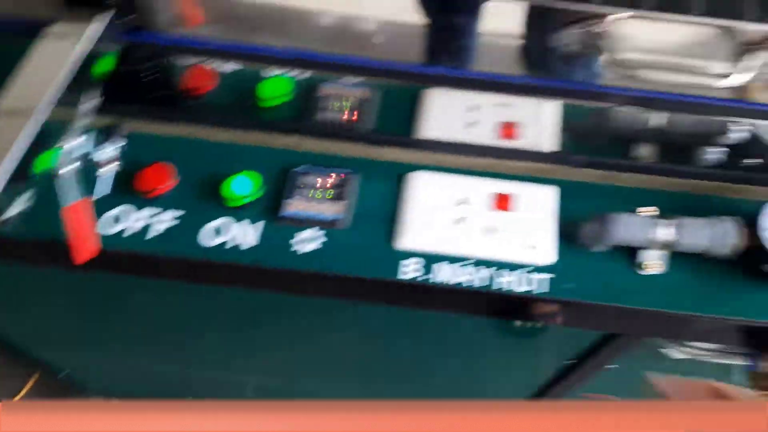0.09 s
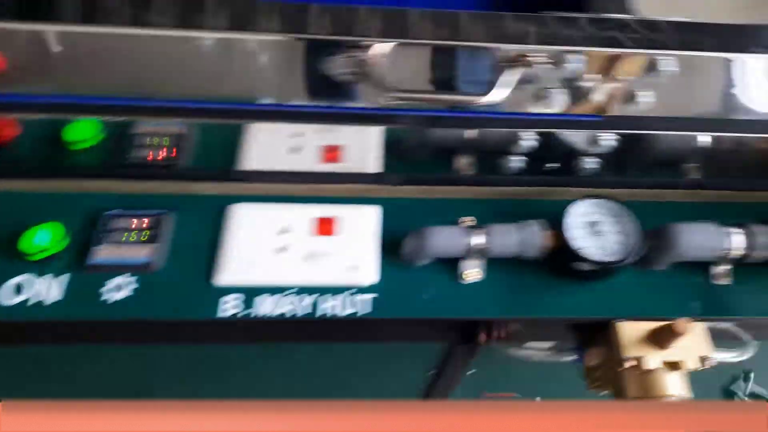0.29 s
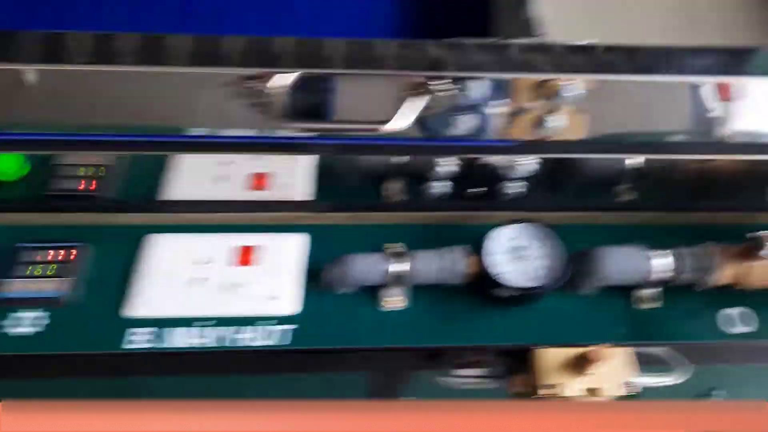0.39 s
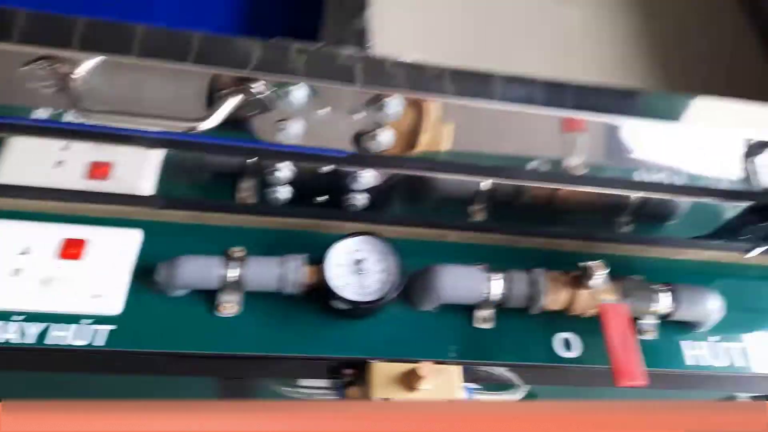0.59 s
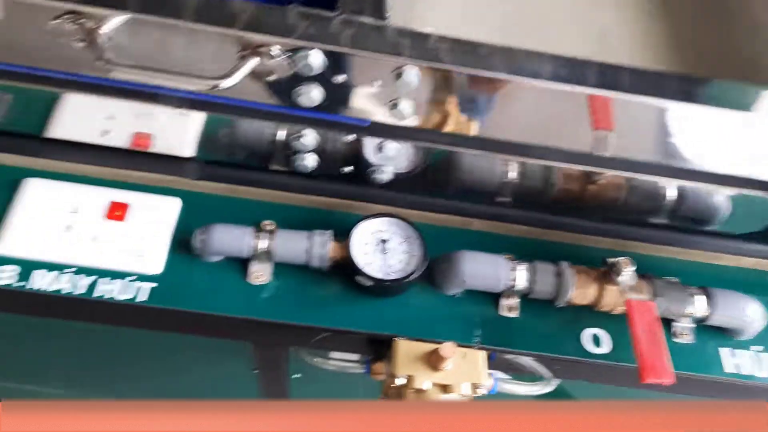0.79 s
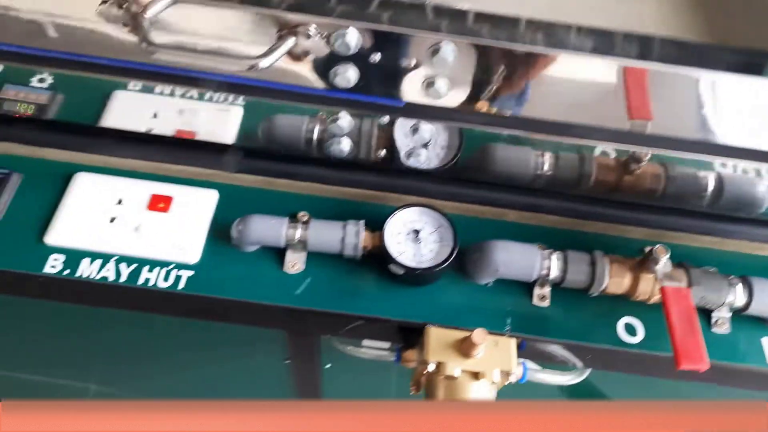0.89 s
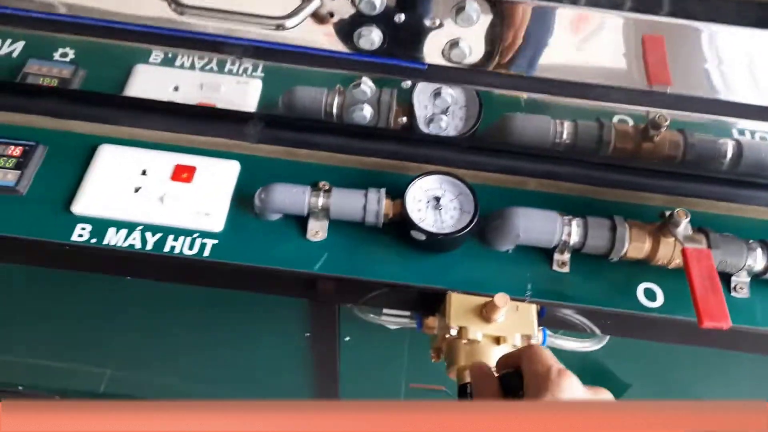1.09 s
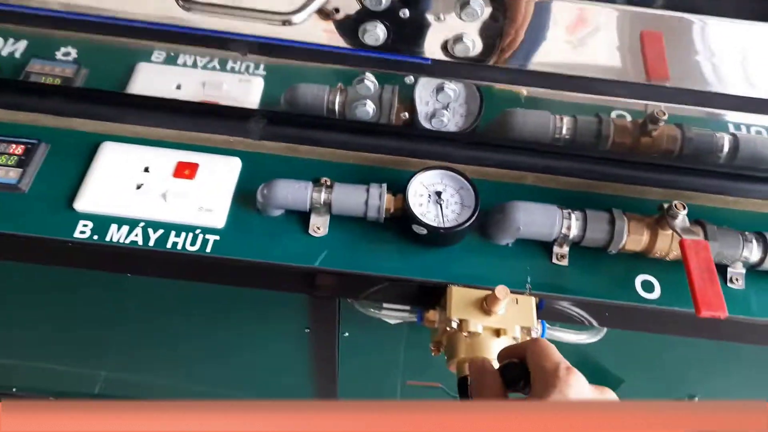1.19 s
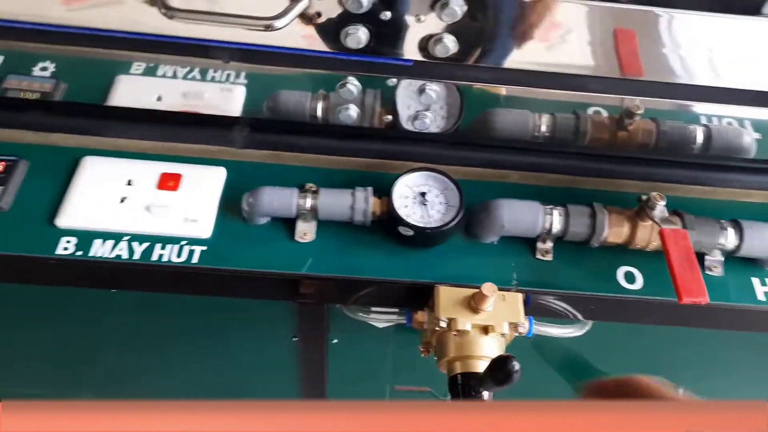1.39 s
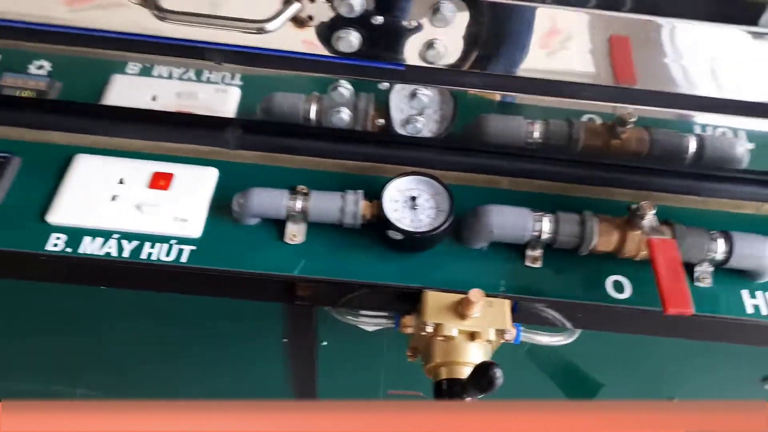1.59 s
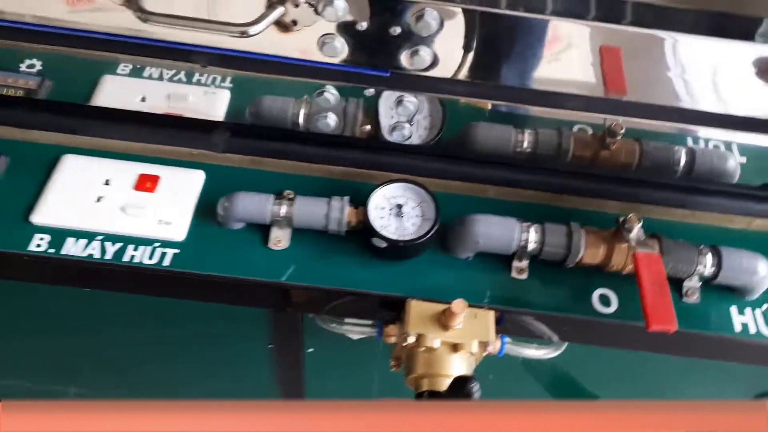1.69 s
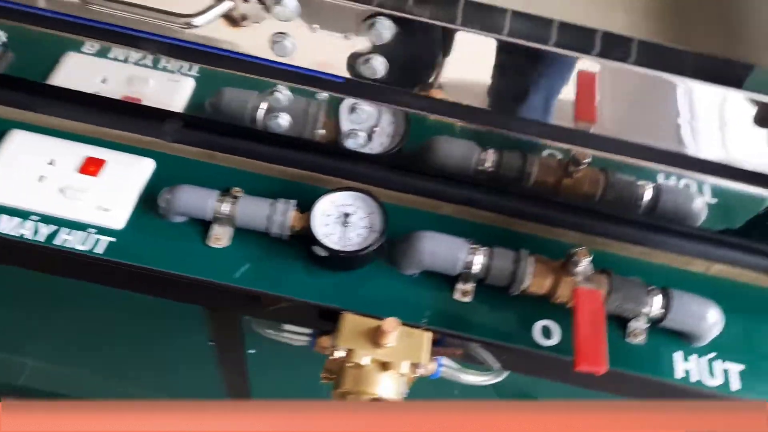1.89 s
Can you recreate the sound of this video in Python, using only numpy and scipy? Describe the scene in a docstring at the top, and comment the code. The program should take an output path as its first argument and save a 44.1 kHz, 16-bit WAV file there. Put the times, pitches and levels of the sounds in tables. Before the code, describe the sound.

A loud compressed-air blast from a brass hand valve: a knock, a harsh roaring hiss buffeting the close microphone, abrupt shut-off, a lever click and faint touches over low machinery rumble in a workshop.

```python
"""A hand valve on a workshop machine knocks open and vents compressed air for three quarters of a second.
Shaped noise makes the air: it spits through the narrow gap as the valve opens and shuts, and in between
the jet hisses while its stream roars and booms on the microphone. Noise bursts and ringing sines make the
knock; a noise tick and clack make the lever click back as the hiss dies in the room. Behind are machinery
rumble, light touches and faint rustles. Gain control ducks the whole sound and recovers slowly."""
import sys
import numpy as np
from scipy import signal
from scipy.fft import rfft, irfft
from scipy.io import wavfile
from scipy.ndimage import uniform_filter1d

SR = 44100
rng = np.random.default_rng(int(sys.argv[2]) if len(sys.argv) > 2 else 0)


def master_out(mix):
    """Clip the mix to full scale and print it as 16-bit PCM to the path in sys.argv[1]."""
    frames = np.transpose(np.atleast_2d(mix))
    ceiling = np.clip(frames, -1, 1)
    pcm = np.round(ceiling * 32767).astype(np.int16)
    wavfile.write(sys.argv[1], SR, pcm)


N = 83790
TIME = np.arange(N) / SR  # seconds
FREQS = np.maximum(np.fft.rfftfreq(N, 1 / SR), 1)  # Hz, kept above zero for the logarithms


def from_db(db):
    """Decibels to gain."""
    return 10 ** (np.asarray(db) / 20)


def at_hz(table, hz, column=1):
    """One column of a table, read between its rows on a log-frequency axis."""
    table = np.array(table)
    return np.interp(np.log(hz), np.log(table[:, 0]), table[:, column])


# A slight random unevenness, stronger towards the treble, roughens every noise spectrum.
UNEVEN_DB, UNEVEN_WIDTH_HZ = 0.9, 55


def air(table, alike_hz=1):
    """Stereo noise coloured by a table for each side; well below alike_hz both sides hear the same."""
    white = rfft(rng.standard_normal((3, N)))  # left, right and shared
    share = 1 / (1 + (FREQS / alike_hz) ** 2)
    mixed = np.sqrt(1 - share) * white[:2] + np.sqrt(share) * white[2]
    colour = from_db([at_hz(table, FREQS, column=1), at_hz(table, FREQS, column=2)])
    uneven = np.interp(FREQS / UNEVEN_WIDTH_HZ, np.arange(1000), rng.standard_normal(1000))
    uneven = uneven * FREQS / (FREQS + 2000)  # stronger towards the treble
    colour = colour * from_db(UNEVEN_DB * uneven)
    colour = colour / np.sqrt(1 + (20 / FREQS) ** 4)  # fade out below 20 Hz
    return irfft(mixed * colour, N) * np.sqrt(SR / 2)  # the root makes the table's unit dB per Hz


def drift(rate_hz):
    """Slow random wandering for each side, with an overall spread of 1."""
    slow = irfft(rfft(rng.standard_normal((2, N))) / (1 + (FREQS / rate_hz) ** 2), N)
    return slow / slow.std()


def low_pass(x, hz):
    """Gentle causal filter that dulls the sound above hz."""
    return signal.sosfilt(signal.butter(2, min(hz, SR / 2 - 1000), fs=SR, output="sos"), x)


def swell(start, rise, hold, t60):
    """Straight rise, hold, then a fade that loses 60 dB in t60 seconds."""
    age = TIME - start
    fade_db = -60 * np.maximum(age - rise - hold, 0) / t60
    return np.clip(age / rise, 0, 1) * from_db(fade_db)


def swells(rows):
    """Add up one swell for each row of a table."""
    return sum(from_db(db) * swell(start, rise, hold, t60) for start, db, rise, hold, t60 in rows)


def pan(db):
    """Left and right gains: the left goes up by db and the right goes down by db."""
    return from_db([[db], [-db]])


# Workshop machinery. Each row: frequency in Hz, left and right level in dB per Hz before SHOP_DB.
SHOP_SPECTRUM = [(25, -83, -85), (58, -61.5, -65), (110, -63, -64), (156, -65.5, -66), (210, -79.5, -78.5),
                 (324, -67.5, -68), (520, -76, -78), (750, -79, -81.5), (1860, -80, -90.5),
                 (3200, -88, -97.5), (6300, -100, -96), (9500, -104, -119), (13500, -106, -112),
                 (15500, -114, -116)]
SHOP_ALIKE_HZ, SHOP_DB = 604, -0.5
# Faint high rustles. Each row: start in seconds, level in dB, rise, hold and 60 dB fade in seconds.
RUSTLE_TIMES = [(0.074, -14.5, 0.032, .07, .4), (1.58, -1.5, 0.037, 0.041, 0.56)]
# Colour of the rustles. Each row: frequency in Hz, left and right dB per Hz before the level of each rustle.
RUSTLE_SPECTRUM = [(1998, -110, -115), (5035, -92.5, -102), (8000, -88, -102), (10000, -92, -112),
                   (13500, -90.5, -94), (15500, -104, -106)]
# The hand lets go of the lever with two light touches. Each row: start in seconds, level in dB.
TOUCH_TIMES = [(1.345, -4), (1.366, -1)]
# Colour of the touches. Each row: frequency in Hz, left and right dB per Hz before the level of each touch.
TOUCH_SPECTRUM = [(300, -74, -87), (1100, -67.5, -73), (1450, -61, -70), (1620, -62, -67), (1850, -65, -71),
                  (2300, -76, -79), (3600, -69.5, -78), (7000, -105, -99)]


def workshop():
    """Steady noise for the machinery, and short noise swells for two rustles and two light touches."""
    rumble = from_db(SHOP_DB) * air(SHOP_SPECTRUM, SHOP_ALIKE_HZ)
    rustles = swells(RUSTLE_TIMES) * air(RUSTLE_SPECTRUM)
    touch_level = sum(from_db(db) * swell(start, rise=0.003, hold=0, t60=0.16) for start, db in TOUCH_TIMES)
    return rumble + rustles + touch_level * air(TOUCH_SPECTRUM)


# Ringing valve body and panel.
# Each row: frequency in Hz, level in dB before each knock's own, 60 dB fade in seconds, pan to the left in dB.
BODY_MODES = [(353, -8, 0.071, 1), (451, 1, .18, 2), (800, -6.5, 0.078, 5.5), (1000, -9.5, .03, 3),
              (1565, -3.5, .03, 5.5), (1865, -5, .03, 8), (2180, 4, .01, 4.5), (2579, -8, .025, 3.5),
              (3493, -17.5, .03, 5.5)]


def body_ring(start):
    """A blow sets the body's modes ringing as fading sines, each a little different on each side."""
    age = np.maximum(TIME - start, 0)
    ring = 0
    for k, (hz, db, t60, pan_db) in enumerate(BODY_MODES):
        gain = from_db(db + rng.normal(0, 1, (2, 1))) * pan(pan_db)
        phase = rng.normal(0, 0.41, (2, 1))  # radians
        wave = np.sin(2 * np.pi * hz * age + phase) * (-1) ** k  # every other mode is flipped
        ring = ring + gain * swell(start, rise=0.0003, hold=0, t60=t60) * wave
    return ring


# The valve spool strikes and rebounds. Each row: start in seconds, level in dB, contact cut-off in Hz.
SPOOL_KNOCKS = [(0.2043, -22.5, 2700), (0.2118, -28, 7170)]
# The panel's dense rattle under the knock. Each row: frequency in Hz, left and right dB per Hz.
THUD_SPECTRUM = [(150, -62.5, -71), (295, -48.5, -49.5), (420, -49, -48), (646, -56, -61),
                 (1315, -57, -61.5), (2320, -58, -64.5), (3200, -74, -76.5), (7000, -88, -91)]
CRACK_DB, CRACK_T60_S, CRACK_PAN_DB = 3, 0.023, 4.5  # level before each knock's own


def knock():
    """The spool hits its stop twice: short noise cracks and a ringing body over one thud of the panel."""
    first_start = SPOOL_KNOCKS[0][0]
    out = air(THUD_SPECTRUM) * swell(first_start, rise=0.002, hold=0, t60=0.12)
    for start, db, contact_hz in SPOOL_KNOCKS:
        burst = rng.standard_normal((2, N)) * swell(start, rise=0.00024, hold=0, t60=CRACK_T60_S)
        crack = from_db(CRACK_DB) * pan(CRACK_PAN_DB) * burst
        out = out + from_db(db) * low_pass(crack + body_ring(start), contact_hz)
    return out


# Room reverberation. Each row: frequency in Hz, 60 dB fade in seconds, relative strength in dB.
ROOM_BANDS = [(200, .5, -4), (750, 1, -2), (1900, 0.94, 2), (3302, 0.84, 0.5), (5500, 0.73, 1),
              (8900, .67, 2), (15000, 0.5, 0.5)]


def room(x):
    """Diffuse workshop echoes: a noise tail whose bands each have their own strength and fade."""
    edges = np.geomspace(60, 18000, 21)  # Hz
    white = rfft(rng.standard_normal((2, N))) * from_db(at_hz(ROOM_BANDS, FREQS, column=2))
    tail = 0
    for low, high in zip(edges, edges[1:]):
        band = irfft(white * (FREQS >= low) * (FREQS < high), N)
        t60 = at_hz(ROOM_BANDS, np.sqrt(low * high))
        tail = tail + band * swell(0.003, rise=0.002, hold=0, t60=t60)
    tail = tail / np.sqrt(np.sum(tail ** 2, axis=1, keepdims=True))  # same energy on each side
    return signal.fftconvolve(x, tail, axes=1)[:, :N]


OPEN_S, SHUT_S, OPEN_RAMP_S, SHUT_RAMP_S = 0.2425, 0.99, 0.004, 0.016  # ramps begin at OPEN_S and SHUT_S


def opening():
    """How far the valve stands open, from 0 to 1."""
    opened = np.clip((TIME - OPEN_S) / OPEN_RAMP_S, 0, 1)
    shut = np.clip((TIME - SHUT_S) / SHUT_RAMP_S, 0, 1)
    return opened * (1 - shut)


# The jet's own hiss. Each row: frequency in Hz, left and right dB per Hz before HISS_DB.
HISS_SPECTRUM = [(200, -54.5, -57.5), (700, -49.5, -58), (1300, -44, -49.5), (1980, -41, -48.5),
                 (3010, -41.5, -45), (4100, -41, -46.5), (5900, -42.5, -39), (7100, -42.5, -47.5),
                 (9100, -47, -62.5), (11000, -38.5, -59), (13500, -43.5, -52.5), (15630, -49, -54)]
HISS_DB = -1.5
# The valve passes half-open. Each row: start in seconds, level in dB, rise, hold and 60 dB fade in seconds.
SPIT_TIMES = [(0.2424, -2.5, 0.0023, 0.0088, 0.043), (0.953, -2.5, 0.0087, 0.0059, 0.081)]
# Its shrill spit. Each row: frequency in Hz, left and right dB per Hz before the level of each spit.
SPIT_SPECTRUM = [(1000, -49, -45), (3294, -37.5, -48), (4060, -37, -47.5), (4960, -30, -32.5),
                 (5400, -34, -32), (6000, -29, -27), (6700, -39, -36), (7860, -32, -32.5), (9160, -38, -58),
                 (11400, -44, -54.5), (15400, -35, -36)]


def jet():
    """Air rushing through the valve: steady noise while it is open, with a shrill burst at each end."""
    hiss = from_db(HISS_DB) * opening() * air(HISS_SPECTRUM)
    return hiss + swells(SPIT_TIMES) * air(SPIT_SPECTRUM)


CHURN_DB, CHURN_HZ = 1.0, 14


def churn(x):
    """Smaller eddies stir each octave of the roar by itself, so the colour keeps shifting."""
    spectrum = rfft(x)
    octave = np.round(np.log2(np.clip(FREQS, 500, 8000) / 500))
    out = 0
    for k in np.unique(octave):
        band = irfft(spectrum * (octave == k), N)
        out = out + band * from_db(CHURN_DB * drift(CHURN_HZ))
    return out


# Air buffeting the two microphone ports.
# Each row: frequency in Hz, left and right dB per Hz before the stream's strength.
BUFFET_SPECTRUM = [(25.3, -46.5, -52.5), (64.7, -32, -27), (140.5, -31, -29), (240, -33.5, -32),
                   (304, -26.5, -24), (385, -28.5, -28.5), (459, -33, -29), (700, -32, -33),
                   (2020, -35.5, -35), (4160, -40.5, -40), (6140, -43, -41), (7040, -46.5, -43),
                   (7800, -50, -48.5), (8650, -60, -54), (9500, -45.5, -56.5), (10200, -46, -48.5),
                   (11240, -43.5, -46), (13640, -37, -38), (15800, -44, -43.5)]
# Strength of the air stream at each port, before flutter. Each row: time in seconds, left and right level in dB.
STREAM_STRENGTH = [(.243, -27, -20), (.252, -13, -6), (.264, -7, -1), (.282, -5, -4.5), (.335, -0.5, 1.5),
                   (0.385, 0, 0), (.435, 0, 1.5), (.461, 5.5, 0.5), (.477, 4, 2.5), (.494, 6, 4),
                   (0.53, 3, 3), (.58, 3.5, 3.5), (.68, 1.1, 1.8), (.83, 1.5, 1), (.885, 1.5, 1.7),
                   (.935, 0.5, 0), (.968, -5, -5), (.98, -19, -21), (1.0, -42, -46), (1.04, -77, -77)]
FLUTTER_DB, FLUTTER_HZ = 0.3, 60
EDDY_DB, EDDY_HZ, EDDY_TOP_HZ = 1.5, 54, 550  # big eddies make the low end swell
LOW_FOLLOWS = 0.63  # share of the stream's dB swing that the low end follows: a weak stream sounds dull


def buffet():
    """The stream makes separate noise on each port; its low end swells in eddies and fades less than the top."""
    times, *sides = np.transpose(STREAM_STRENGTH)
    stream_db = np.array([np.interp(TIME, times, db) for db in sides])
    stream_db = stream_db + FLUTTER_DB * drift(FLUTTER_HZ)
    roar = air(BUFFET_SPECTRUM)
    low = irfft(rfft(roar) / (1 + (FREQS / EDDY_TOP_HZ) ** 4), N)
    top = from_db(stream_db) * churn(roar - low)
    eddies = from_db(LOW_FOLLOWS * stream_db + EDDY_DB * drift(EDDY_HZ))
    flowing = (TIME > times[0]) * (TIME < times[-1])
    return (top + eddies * low) * flowing


# Low gusts on the ports. Each row: start in seconds, level in dB, rise, hold and 60 dB fade in seconds.
GUST_TIMES = [(.248, -6, .006, .012, .06), (0.913, -0.5, 0.019, 0.037, 0.037)]
# Colour of the gusts. Each row: frequency in Hz, left and right dB per Hz before the level of each gust.
GUST_SPECTRUM = [(30, -39, -45.5), (70, -29.5, -29.5), (132, -29.5, -26), (221, -28, -43),
                 (300, -19.5, -15.5), (356, -39.5, -42.5), (480, -28.5, -31.5), (800, -51.5, -56),
                 (3000, -90, -89.5)]


def gusts():
    """Low noise swells: the stream booms on the ports as it first arrives and again as it slows."""
    return air(GUST_SPECTRUM) * swells(GUST_TIMES) * opening()


# The lever's housing. Each row: frequency in Hz, left and right dB per Hz.
CLACK_SPECTRUM = [(150, -81, -76), (350, -50, -49), (700, -61.5, -62), (1410, -57, -62), (2010, -49.5, -60),
                  (2700, -55, -66), (3800, -53, -56), (7000, -79, -72)]
CLICK_S, CLICK_DB, CLICK_T60_S, CLICK_PAN_DB = 1.079, -13, 0.02, 6  # level before the pan
CLACK_T60_S = 0.13


def lever_click():
    """The lever clicks home: a bright noise tick and the longer clack of its housing."""
    burst = rng.standard_normal((2, N)) * swell(CLICK_S, rise=0.00029, hold=0, t60=CLICK_T60_S)
    tick = from_db(CLICK_DB) * pan(CLICK_PAN_DB) * burst
    clack = air(CLACK_SPECTRUM) * swell(CLICK_S, rise=0.002, hold=0, t60=CLACK_T60_S)
    return tick + clack


ROOM_DB, KNOCK_ROOM_DB = -13, -7  # how much of the jet, and of the knock and click, goes into the room


def scene():
    """Valve sounds in the room, the buffeting on the microphone, the workshop behind."""
    hiss = jet()
    hits = knock() + lever_click()
    echoes = room(from_db(ROOM_DB) * hiss + from_db(KNOCK_ROOM_DB) * hits)
    return workshop() + hits + hiss + echoes + buffet() + gusts()


CEILING_DB, DETECTOR_S, RECOVER_DB_PER_S = -13, 0.011, 2.5
CUTOFF_HZ = 15750


def record(dry):
    """Gain control that ducks at once and recovers slowly, then a steep treble cut-off."""
    power = uniform_filter1d(np.mean(dry ** 2, axis=0), max(int(DETECTOR_S * SR), 2))
    over_db = np.maximum(10 * np.log10(np.maximum(power, 1e-12)) - CEILING_DB, 0)
    # hold the deepest duck so far, letting it recover at a steady rate
    recovered_db = RECOVER_DB_PER_S * TIME
    duck_db = np.maximum.accumulate(over_db + recovered_db) - recovered_db
    ducked = dry * from_db(-duck_db)
    top = 1 / np.sqrt(1 + (np.fft.rfftfreq(2 * N, 1 / SR) / CUTOFF_HZ) ** 240)
    return irfft(rfft(ducked, 2 * N) * top)[:, :N]


dry = scene()
out = record(dry)
master_out(out)
```